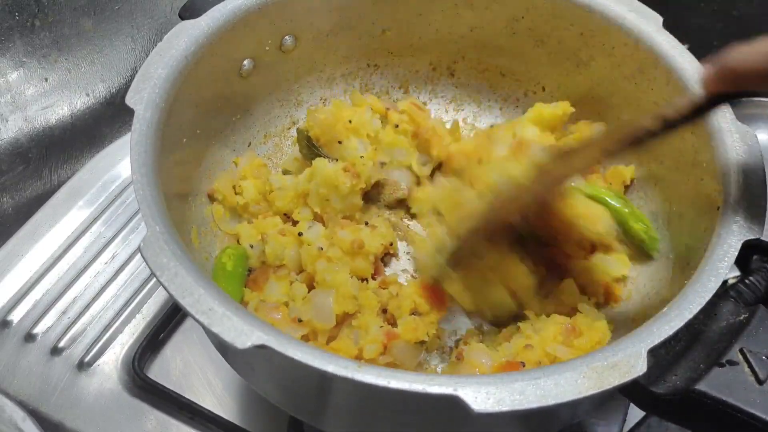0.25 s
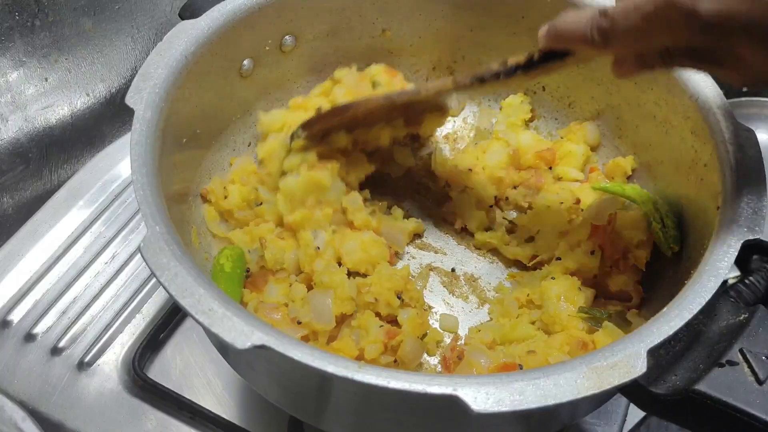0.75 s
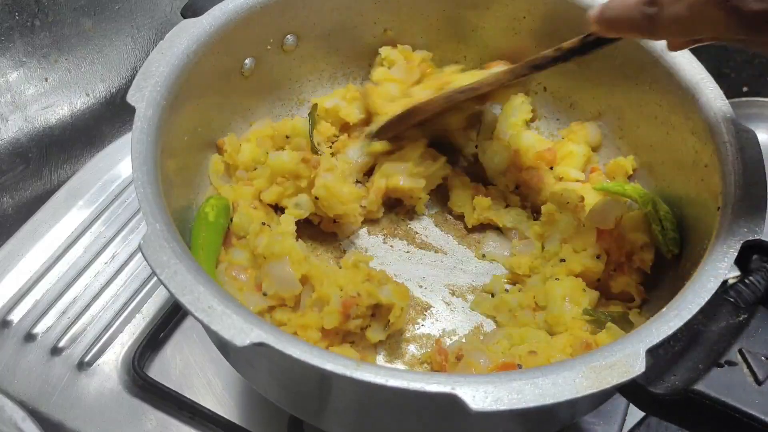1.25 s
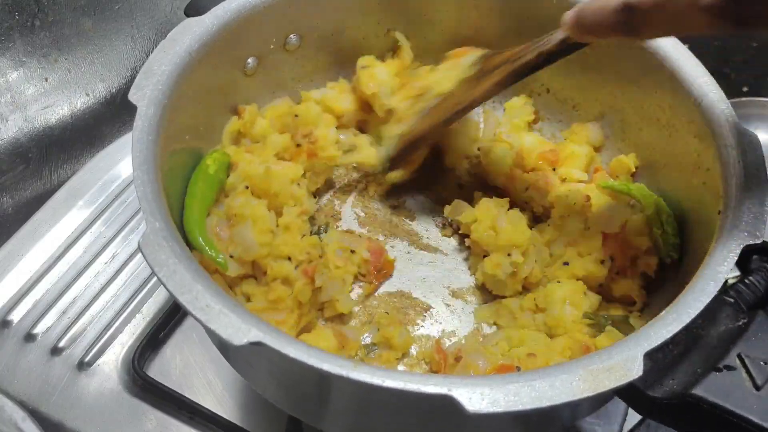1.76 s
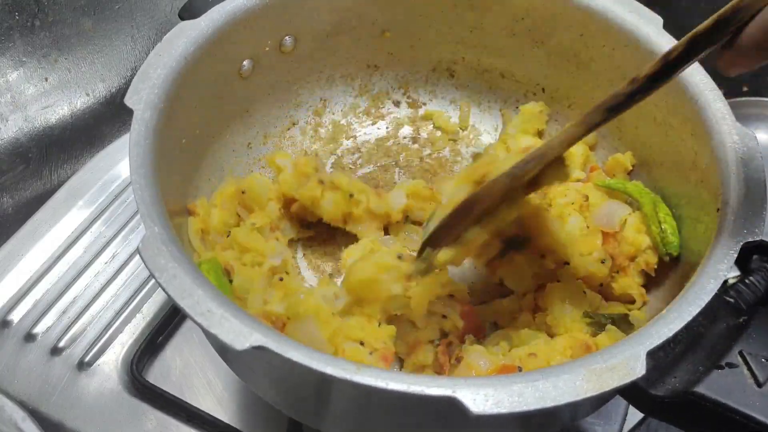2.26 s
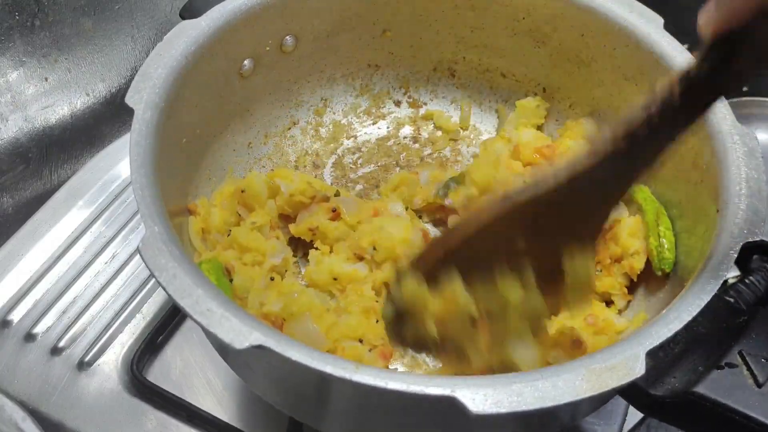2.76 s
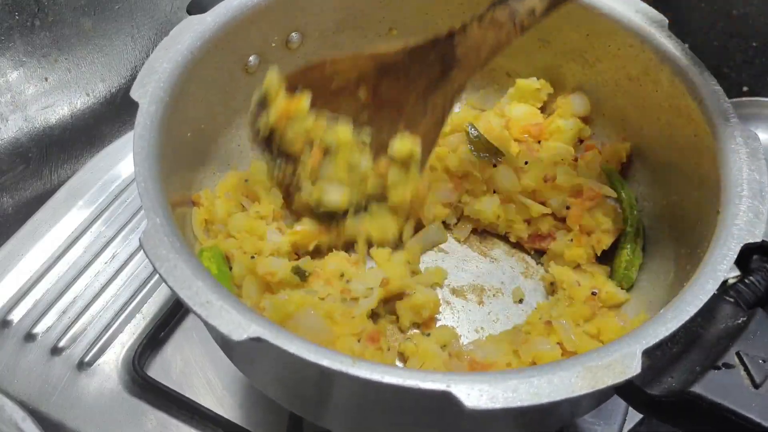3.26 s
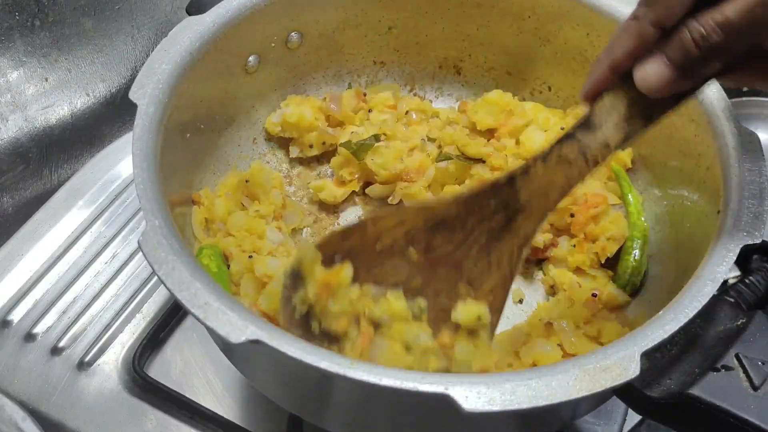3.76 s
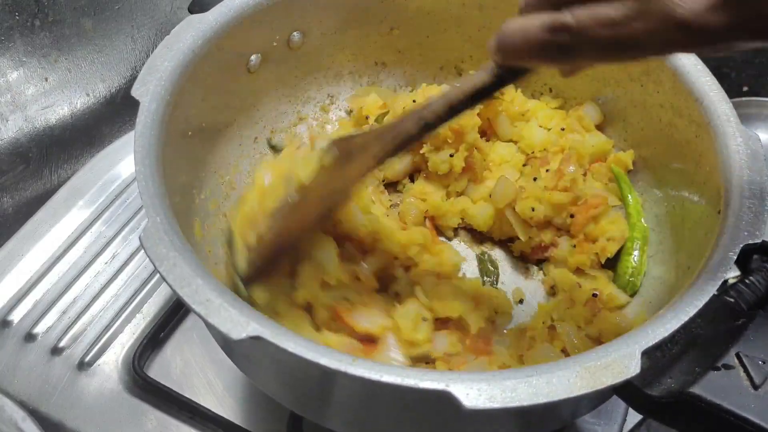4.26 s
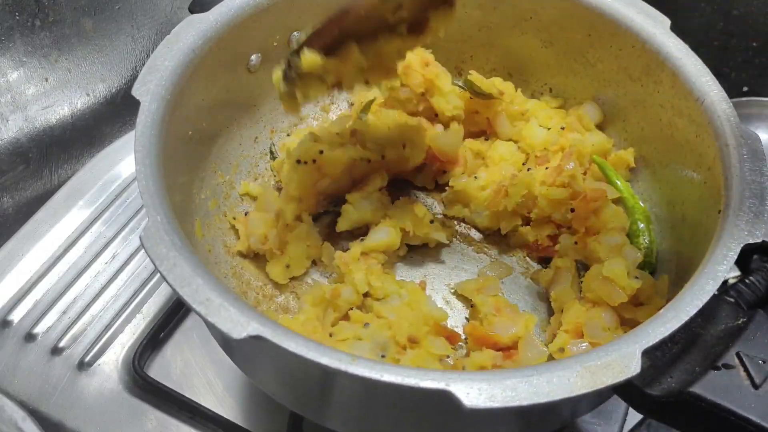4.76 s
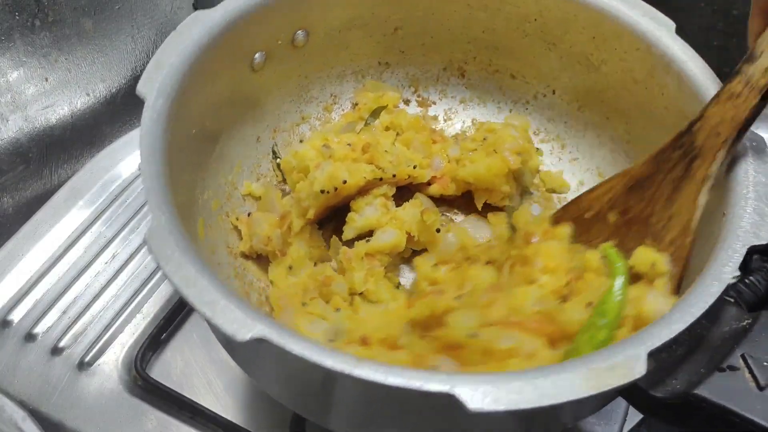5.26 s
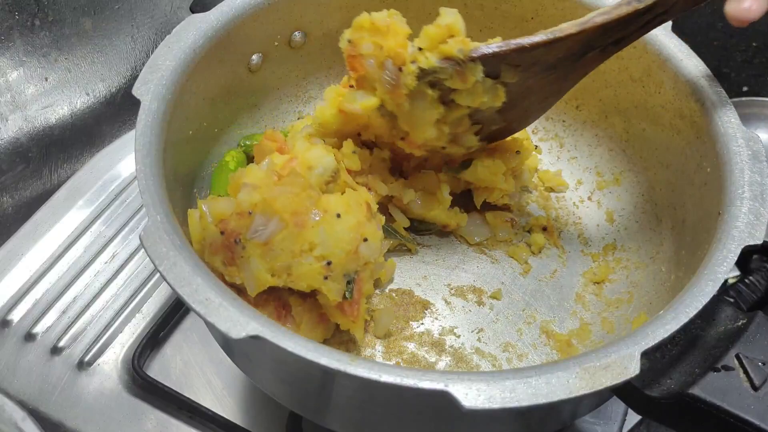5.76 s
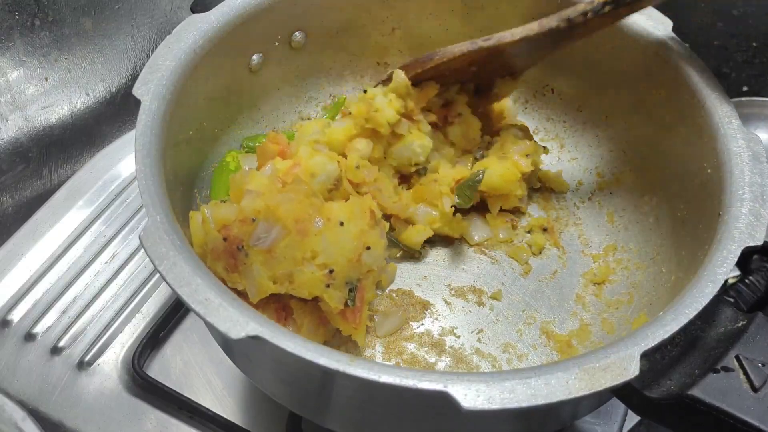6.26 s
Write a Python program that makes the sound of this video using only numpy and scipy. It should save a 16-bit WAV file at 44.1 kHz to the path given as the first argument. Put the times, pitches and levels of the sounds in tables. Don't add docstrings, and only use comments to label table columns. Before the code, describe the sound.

Close microphone beside a heavy pot on a stove, with faint room hum and weak sizzle. Wood hits metal several times in an irregular stirring rhythm, each dull clonk followed by a scrape. Brighter cracks come in pairs around the middle, with a thin squeak. After a quieter gap, the blade rasps, slaps the wall loudly, sweeps the bare metal and leaves a short ring before a soft final touch.

```python
import sys
import numpy as np
from scipy import signal
from scipy.fft import rfft, irfft, next_fast_len
from scipy.io import wavfile
from scipy.ndimage import uniform_filter1d

SR = 44100
rng = np.random.default_rng(int(sys.argv[2]) if len(sys.argv) > 2 else 0)


def generate_wav(sig):
    pcm = np.round(np.clip(np.atleast_2d(sig).T, -1, 1) * 32767).astype(np.int16)
    wavfile.write(sys.argv[1], SR, pcm)


def level_to_linear(level):
    exponent = np.asarray(level, float) / 20
    return 10 ** exponent


N = 287532

# f/Hz, level/dB per Hz
KITCHEN = [(15, -67), (25, -9), (209, -4), (282, -21), (399, -14), (920, -26), (1530, -24.5), (1710, -22.5),
           (2930, -15), (4380, -16), (5890, -24), (6740, -30.5), (15500, -28)]
# t/s, level/dB
SIZZLE = [(0.0, -50), (2.72, -51), (3.19, -54), (4.99, -52), (5.19, -64), (5.48, -83), (5.771, -60),
          (6.52, -55.5)]
# f/Hz, correlation/1
SAME = [(60, 0.89), (180, 0.84), (550, 0.28), (1650, -1.26), (4970, 0.7), (15000, -0.31)]
# f/Hz, left-right/dB
PORTS = [(60, -0.5), (250, -1.3), (600, 1.1), (1300, -1.5), (2600, -1), (4200, -4), (6500, -16), (8500, 1),
         (10500, 0.5), (13000, -6.5), (15500, -20.5)]

# level/dB on stand, wall, edge, grit, stove
REST_DB = [-75, -72, -66, -59.5, -74]
# t/s, hold/s, stand level/dB, wall level/dB, edge level/dB
STROKES = [(0.0, 0.045, -34.5, -33.5, -37), (.255, 0.06, -74, -78, -51.5),
           (0.557, 0.077, -34, -31.5, -36.5), (.84, 0.065, -41.5, -79, -77), (1.082, 0.26, -41.5, -42, -74),
           (1.31, 0.084, -33.5, -45.5, -65), (1.618, 0.02, -50, -71, -60), (1.83, 0.1, -35, -43.5, -41),
           (2.096, 0.42, -44.5, -57, -58.5), (2.644, 0.051, -40.5, -50.5, -51.5),
           (2.827, 0.038, -55, -81, -78), (2.954, 0.079, -38.5, -45, -42.5), (3.025, 0.06, -30, -43.5, -48),
           (3.293, 0.045, -37, -55, -47), (3.363, 0.0043, -28.5, -37, -43), (3.871, 0.057, -37, -48, -47),
           (3.928, 0.0092, -25.5, -35, -40.5), (4.23, 0.086, -31.5, -37, -42.5),
           (4.661, 0.072, -37, -29.5, -42.5), (4.976, 0.098, -38.5, -51, -45),
           (5.39, 0.049, -35, -32, -50.5), (5.436, 0.023, -29.5, -31.5, -28), (5.643, 0.012, -29, -47, -46),
           (6.302, 0.05, -60, -71, -60)]
# middle t/s, length/s, stand level/dB, metal level/dB, grit level/dB
SLIDES = [(0.0, 0.17, -48, -48, -39.5), (0.31, 0.27, -64.5, -63.5, -54.5), (0.62, 0.17, -46, -49, -38),
          (0.887, 0.5, -72, -62, -55), (1.26, 0.75, -52, -71, -65), (1.79, 0.24, -52.5, -59, -68),
          (1.872, 0.11, -34, -59, -45), (2.756, 0.18, -50.5, -92, -80), (3.26, 0.14, -48, -55.5, -61),
          (3.54, 0.34, -82, -57.5, -55), (3.852, 0.04, -49, -69, -58), (4.37, 0.61, -63, -64, -59),
          (5.013, 0.11, -57.5, -47.5, -45.5), (5.145, 0.13, -51.5, -51, -47.5),
          (5.303, 0.94, -56.5, -50, -50.5), (5.441, 0.13, -43, -35.5, -53), (5.51, 0.27, -34, -39, -31.5),
          (5.854, 0.83, -64, -72, -104), (6.351, 0.68, -68.5, -65.5, -60.5)]
# rate/(dB/s) on stand, wall, edge, grit, stove
RELEASE_DB_PER_S = [180, 197, 180, 130, 81.4]
# f/Hz, level/dB per Hz
DRAG = [(24, -72), (40, -48.5), (241, 0.5), (287, 9), (317, -4), (397, -3), (562, -6), (881, -8.5),
        (1220, -15), (1820, -16.5), (4570, -21.5), (6980, -14.5), (9900, -22), (10900, -32), (15500, -31)]
# f/Hz, level over the drag/dB, t60/s
POT = [(136, 21, 1), (178.2, 14, 0.83), (249, -2, 0.095), (300, -5, 0.91), (353.8, 9.5, 0.26),
       (397, 8.5, 0.17), (520, -4, 0.12), (649, 2.5, 0.12), (815, -8, 0.33), (881, 8.5, 0.35),
       (980, 2.5, 0.092), (1033, 2, 0.039), (1183, 5.5, 0.021), (1580, 0, 0.38), (1726, 0, 0.095),
       (2260, 3, 0.25), (2460, 5.5, 0.15), (2900, 6.5, 0.35), (3335, 5, 0.3), (3590, 4, 0.36),
       (4480, 6, 0.036), (5010, 6.5, 0.11), (6050, -2, 0.083), (5400, 5, 0.27), (6750, 1, 0.41),
       (7100, 5, 0.08), (7400, 8, 0.067), (8560, 14.5, 0.47)]
EDGES_HZ = [150, 760, 1400, 4000, 16500]

# t/s, peak level/dB, f/Hz, spread/share of f, t60/s
KNOCKS = [(0.547, -16.5, 852, 0.63, 0.053), (0.552, -22.5, 843, 0.25, 0.034), (0.841, -32, 418, 0.2, 0.045),
          (1.082, -31, 840, 0.31, 0.045), (1.3177, -17.5, 540, 0.4, 0.058),
          (2.103, -37.5, 407, 0.32, 0.042), (2.648, -36, 690, 0.78, 0.016), (4.235, -19, 592, 0.36, 0.013),
          (4.6628, -21, 858, 0.58, 0.036), (4.667, -22, 827, 0.18, 0.14), (4.974, -37.5, 345, 0.26, 0.036),
          (5.392, -13.5, 696, 0.18, 0.051), (5.63, -30, 330, 0.22, 0.02)]
CRACKS = [(1.7858, -26, 1840, 0.05, 0.04), (1.8233, -18, 1775, 0.29, 0.038),
          (2.9517, -21.5, 2063, 0.16, 0.044), (3.0252, -21.5, 1950, 0.13, 0.022),
          (3.294, -26, 1810, 0.22, 0.042), (3.367, -15, 2060, 0.15, 0.013),
          (3.8715, -27.5, 2030, 0.16, 0.072), (3.9282, -16.5, 1874, 0.2, 0.021),
          (4.2349, -20.5, 1720, 0.43, 0.011), (4.9745, -34, 2550, 0.92, 0.015)]
TICKS = [(2.9512, -21.5, 3030, 0.45, 0.023), (3.001, -31, 3000, 0.72, 0.014),
         (3.371, -41, 3100, 0.3, 0.014), (3.9293, -28, 3730, 0.068, .02), (4.236, -26, 3500, .12, .02),
         (4.664, -35, 4620, 0.023, 0.04), (6.419, -34, 7050, 0.054, 0.023)]
SLAP = [(5.4047, -12, 4400, .014, .03), (5.4047, -10.5, 5850, .014, .03), (5.4048, -16, 6450, .012, .028),
        (5.4049, -21, 8300, .04, .018), (5.405, -10.5, 2900, 0.022, 0.05), (5.4052, -14, 1770, 0.03, 0.075)]
CATCHES = [(1.167, -31, 875, .08, .03), (1.718, -37, 1420, 0.033, .04), (1.743, -32, 1770, 0.041, .035),
           (1.756, -32, 1800, 0.057, .03), (5.112, -41, 1014, .15, .03), (5.177, -26.5, 1120, 0.12, .03),
           (5.199, -42, 1246, 0.28, .025), (5.219, -38, 1030, 0.055, .03), (5.25, -33.5, 960, 0.072, .03),
           (5.292, -33.5, 940, 0.047, .03), (5.347, -32, 910, .2, .03)]
BUMPS = [(1.849, -29, 300, 0.24, 0.095), (2.635, -45, 300, 0.34, 0.077), (2.957, -38, 382, 0.024, 0.2),
         (2.979, -30.5, 370, 0.021, .12), (3.371, -27.5, 389, 0.069, 0.17), (1.322, -31.5, 402, 0.13, .15),
         (4.24, -32.5, 364, .05, .15), (3.064, -35, 300, 0.068, 0.081), (3.144, -38, 272, 0.091, .07),
         (3.18, -46, 285, .1, .07), (5.434, -32.5, 300, 0.094, 0.08), (5.466, -27, 340, 0.19, 0.086),
         (5.491, -33, 300, 0.1, .07), (5.516, -41, 285, 0.15, .05), (5.545, -39.5, 290, .1, 0.066),
         (5.648, -28.5, 284, 0.058, 0.12)]
PAN_DB = [-1.2, -6, -1.5, 7, -1.5, -.8]
LEAD_S = [.00003, .0001, .0001, .00021, 0, .0001]

# f/Hz, level/dB, t60/s
BELL = [(882, 1, 0.14), (999, -6, 0.31), (1086.4, -12.5, 0.49), (1128, -13, 0.31), (1615, -13.5, 0.18)]
# t/s, level/dB
BELL_HITS = [(0, -25.5), (0.547, -24.5), (1.319, -39), (4.236, -37), (4.666, -27.5)]
# t/s, low level/dB, low centre f/Hz, upper level/dB, upper centre f/Hz
SCRAPES = [
    [(1.085, -44, 930, -62, 1400), (1.15, -41, 960, -54, 1400), (1.17, -39, 930, -45, 1420),
     (1.2, -45, 1000, -44, 1800), (1.245, -50, 1000, -44, 1650), (1.29, -56, 1000, -56, 1600)],
    [(1.69, -58, 820, -62, 1400), (1.712, -44, 850, -46, 1400), (1.724, -43, 950, -38, 1420),
     (1.742, -40, 975, -39, 1780), (1.76, -41, 975, -38, 1780), (1.775, -48, 975, -46, 1800),
     (1.788, -41, 975, -38, 1850), (1.822, -46, 975, -50, 1800)],
    [(5.108, -50, 1000, -56, 1350), (5.125, -42, 1050, -47, 1380), (5.18, -40, 1090, -45, 1400),
     (5.22, -41, 1060, -47, 1300), (5.29, -47, 1000, -54, 1300), (5.38, -52, 890, -56, 1300)],
]
RASP_HZ = [770, 826, 952, 1082, 1180, 1328, 1420, 1580, 1770, 1963, 2340]
# t/s, f/Hz, level/dB
SQUEAK = [(2.79, 3400, -74), (2.835, 3395, -63), (2.9, 3400, -56), (2.955, 3415, -55), (2.98, 3420, -64),
          (3.2, 3420, -68)]
# t/s, f/Hz, level/dB
RING_LOW = [(5.66, 1760, -70), (5.71, 1750, -63), (5.77, 1750, -69), (5.82, 1750, -82)]
RING_MID = [(5.57, 2560, -58), (5.61, 2555, -48), (5.68, 2550, -53), (5.78, 2550, -63), (5.85, 2550, -76)]
RING_TOP = [(5.56, 8620, -58), (5.62, 8630, -56), (5.7, 8630, -66), (5.83, 8630, -74)]
# t/s, f/Hz, level/dB
OVERTONES = [
    [(2.82, 1620, -79), (2.86, 1610, -68), (2.91, 1600, -73)],
    [(2.82, 1253, -70), (2.92, 1303, -73), (2.95, 1270, -53)],
    [(2.82, 2950, -65), (2.88, 2880, -66), (2.95, 3020, -56)],
    [(1.71, 4940, -53), (1.74, 4900, -72), (1.82, 4820, -58)],
    [(1.71, 3350, -68), (1.76, 3330, -67), (1.82, 3380, -58)],
    [(1.71, 6560, -85), (1.76, 6690, -63), (1.82, 6540, -47)],
    [(5.11, 2860, -56), (5.2, 2766, -56), (5.3, 2840, -69)],
    [(4.975, 2920, -64), (5.03, 2840, -52), (5.07, 2800, -64)],
]

SAG_DB_PER_S = 75.5
DIG_S = .004
GRIT_UNDER_EDGE_DB, SLIDE_ENDS_DB = -9, -21
LIFT_S, LIFT_DB = 4.7, -7.5
SHAKE_DB, SHAKE_SHARE = -54.5, 0.45
WALL_SHARE = 0.06
SLIDE_SHAKE_DB, SLIDE_WALL_DB = -3, -11


def evened(x):
    return x / np.sqrt(np.mean(x ** 2) + 1e-20)


def read(points, hz):
    f, value = np.transpose(points)
    return np.interp(np.log(hz + 1), np.log(f + 1), value)


def add(mix, s, sound):
    part = mix[:, round(s * SR):][:, :sound.shape[1]]
    part += sound[:, :part.shape[1]]


def drift(shape, span):
    smooth = uniform_filter1d(rng.standard_normal(shape), span, -1)
    return evened(uniform_filter1d(smooth, span, -1))


def causal(gain):
    log_gain = np.log(np.maximum(gain, 1e-5 * gain.max()))
    mirrored = np.r_[log_gain, log_gain[-2:0:-1]]
    return np.exp(np.conj(signal.hilbert(mirrored)))[:len(gain)]


def resonate(x, hz, width):
    turn = np.exp(2j * np.pi * np.cumsum(hz) / SR)
    r = np.exp(-np.pi * width / SR)
    return 2 * (turn * signal.lfilter([1 - r], [1, -r], x / turn)).real


def kitchen():
    frames, hz = N // 256 + 5, np.fft.rfftfreq(1024, 1 / SR)
    a, b, c, d = rng.standard_normal((frames, 513, 4)).T
    patches = evened(uniform_filter1d(drift((513, frames), 6), 8, 0))
    same = np.clip(read(SAME, hz), -1, 1)[:, None]
    left = a + 1j * b
    right = same * left + np.sqrt(1 - same ** 2) * (c + 1j * d)
    z = np.array([left, right])
    z *= level_to_linear(read(KITCHEN, hz)[:, None] + 3.4 * patches + 0.33 * drift(frames, 3))
    z *= level_to_linear(np.array([[[-2.5]], [[2.5]]]) * np.clip(hz / 5000, 0, 1)[:, None])
    s, db = np.transpose(SIZZLE)
    level = level_to_linear(np.interp(np.arange(N) / SR, s, db) - 7.5)
    return level * evened(signal.istft(z, nperseg=1024, noverlap=768)[1][:, :N])


def rumble(level_db):
    hz = np.fft.rfftfreq(N, 1 / SR)
    one, *own = rng.standard_normal((3, N))
    colour = (hz / 150) ** 2.47 / (1 + (hz / 170) ** 7)
    low = irfft(rfft(one + 0.14 * np.array(own)) * colour, N)
    return level_to_linear(uniform_filter1d(level_db, 900) + 1.8 * drift(N, 2000)) * evened(low)


def room(x, t60):
    taps = np.zeros((2, SR // 2))
    at = np.arange(120, SR // 2 - 20, 20) + rng.integers(0, 20, (2, (SR // 2 - 121) // 20))
    np.put_along_axis(taps, at, rng.choice([-1., 1.], at.shape), 1)
    tail = taps * level_to_linear(-60 * np.arange(SR // 2) / SR / t60)
    return signal.fftconvolve(x, tail / np.linalg.norm(tail[0]), axes=1)[:, :N]


def squeak(rows, fuzzy):
    s, hz, db = np.transpose(rows)
    t = np.arange(s[0], s[-1], 1 / SR)
    level = level_to_linear(np.interp(t, s, db) + 1.5 * drift(len(t), 250)) * signal.windows.tukey(len(t), .2)
    hz = np.interp(t, s, hz)
    tone = np.sqrt(2) * np.sin(2 * np.pi * np.cumsum(hz) / SR + np.array([[.7], [0]]))
    fuzz = evened(resonate(rng.standard_normal((2, len(t))), hz, 60))
    return s[0], level * (tone + fuzzy * fuzz) * level_to_linear(np.array([[0], [3]]))


def bell(db):
    t = np.arange(SR // 2) / SR
    out = np.zeros((2, len(t)))
    for hz, mode_db, t60 in BELL:
        phase = 2 * np.pi * rng.random((2, 1, 1)) + np.array([[1.6], [0]])
        mode = np.sin(2 * np.pi * hz * t + phase[0])
        twin = .4 * np.sin(2 * np.pi * hz * 1.013 * t + phase[1])
        out += level_to_linear(db + mode_db - 60 * t / t60) * (mode + twin)
    return out * (1 - np.exp(-t / 0.00071))


def scrape(rows):
    s, *columns = np.transpose(rows)
    t = np.arange(s[0], s[-1], 1 / SR)
    low_db, low_hz, upper_db, upper_hz = (np.interp(t, s, c) for c in columns)
    one, *own = rng.standard_normal((3, len(t)))
    rub = (0.6 * one + np.array(own)) * level_to_linear(3.2 * drift(len(t), 80))
    out = np.zeros((2, len(t)))
    for hz in RASP_HZ:
        near = sum(level_to_linear(db) * np.exp(-.5 * (np.log(hz / centre) / reach) ** 2)
                   for db, centre, reach in ((low_db, low_hz, .08), (upper_db, upper_hz, .09)))
        out += near * evened(resonate(rub, hz * np.ones(len(t)), width=50))
    return s[0], level_to_linear(-4) * out * signal.windows.tukey(len(t), .1)


def knock(db, hz, spread, t60, pan_db, lead_s):
    t = np.arange(4000) / SR
    jitter, phase, turn = rng.standard_normal((3, 20, 1))
    place = np.linspace(-2, 2, 20)[:, None] + .08 * jitter
    tone_hz = hz * np.exp(spread * place)
    angle = 2 * np.pi * tone_hz * t + .4 * phase
    weight = np.exp(-place ** 2 / 2)
    left = (weight * np.sin(angle + 2 * np.pi * tone_hz * lead_s)).sum(0)
    right = (weight * np.sin(angle + .4 * turn)).sum(0)
    blow = np.array([left, right]) * level_to_linear(-60 * t / max(t60, .004)) * (1 - np.exp(-t * hz / .7))
    return blow / abs(blow[1]).max() * level_to_linear(db + np.array([[.5], [-.5]]) * pan_db)


def shaken(stand_db, wall_db):
    return SHAKE_DB + SHAKE_SHARE * (stand_db + 44) - WALL_SHARE * (wall_db + 45.0)


def pressure():
    t = np.arange(0, N + 64, 64) / SR
    lift_db = LIFT_DB * np.clip((t - LIFT_S) / 0.032, 0, 1)
    power = level_to_linear(np.array(REST_DB)[:, None] + lift_db) ** 2
    blows = np.array(KNOCKS + CRACKS)[:, 0]
    for s, hold, stand_db, wall_db, edge_db in STROKES:
        s = min([b for b in blows if abs(b - s) < .015] or [s - DIG_S])
        top_db = np.array([[stand_db], [wall_db], [edge_db], [edge_db + GRIT_UNDER_EDGE_DB],
                           [shaken(stand_db, wall_db)]])
        sag_db = SAG_DB_PER_S * np.clip(t - s, 0, hold)
        fall_db = sag_db + np.outer(RELEASE_DB_PER_S, np.maximum(t - s - hold, 0))
        power += np.clip((t - s) / DIG_S, 0, 1) ** 2 * level_to_linear(top_db - fall_db) ** 2
    for s, length, stand_db, metal_db, grit_db in SLIDES:
        top_db = np.array([[stand_db], [metal_db + SLIDE_WALL_DB], [metal_db], [grit_db],
                           [shaken(stand_db, metal_db) + SLIDE_SHAKE_DB]])
        power += level_to_linear(top_db + np.maximum(SLIDE_ENDS_DB * (2 * (t - s) / length) ** 2, -99)) ** 2
    return np.repeat(10 * np.log10(power), 64, axis=1)[:, :N]


def drag(levels_db):
    size = 2 * next_fast_len(N // 2 + SR)
    hz = np.fft.rfftfreq(size, 1 / SR)
    modes = 1 + sum(level_to_linear(db) * 1.1 / t60 / (1.1 / t60 + 1j * (hz - f)) for f, db, t60 in POT)
    slips = level_to_linear(4.5 * np.minimum(rng.exponential(1, N), 4)) * (rng.random(N) < 2500 / SR)
    judder = drift(N, 150)
    lumps_db = [0.99, 0.97, 1.8, 1.3]
    grit_shares = [0.09, 0.22, 0.25, 0.55]
    port_likeness = [0.91, 0.069, 0.25, 0.088]
    out = np.zeros((2, N))
    for db, lo, hi, lumpy_db, gritty, alike in zip(levels_db, EDGES_HZ, EDGES_HZ[1:],
                                                   lumps_db, grit_shares, port_likeness):
        band = np.sqrt((1 + (lo / (hz + 1)) ** 12) * (1 + (hz / hi) ** 12))
        part = modes * causal(level_to_linear(read(DRAG, hz)) / band)
        part = part / np.sqrt(np.mean(abs(part) ** 2))
        one, own = rng.standard_normal(N), rng.standard_normal((2, N))
        one = evened(one * (1 - gritty + gritty * evened(slips)))
        contact = np.sqrt(alike) * one + np.sqrt(1 - alike) * own
        out += irfft(rfft(contact * level_to_linear(db + lumpy_db * judder), size) * part, size)[:, :N]
    return out


def scene():
    *contact_db, stove_db = pressure()
    steady = kitchen() + rumble(stove_db) + drag(contact_db)
    struck = np.zeros((2, N))
    sung = [(SQUEAK, .3), (RING_LOW, .12), (RING_MID, .12), (RING_TOP, .2)]
    for rows, fuzzy in sung + [(rows, .7) for rows in OVERTONES]:
        add(struck, *squeak(rows, fuzzy))
    for s, db in BELL_HITS:
        add(struck, s, bell(db))
    for rows in SCRAPES:
        add(struck, *scrape(rows))
    groups = (KNOCKS, CRACKS, TICKS, SLAP, CATCHES, BUMPS)
    for blows, pan_db, lead_s in zip(groups, PAN_DB, LEAD_S):
        for s, *row in blows:
            add(struck, s, knock(*row, pan_db, lead_s))
    return struck + level_to_linear(-7.0) * room(struck, t60=0.28) + steady


def suppress(x):
    hz, t, z = signal.stft(x, SR, nperseg=1024, noverlap=768)
    band = (hz / 230).astype(int)
    patches = drift((2, band[-1] + 1, len(t)), 11)[:, band]
    depth = np.clip((hz - 500) / 1200, 0, 1)[:, None]
    gain_db = 3.6 * patches - 12 * np.maximum(-patches - 1.7, 0)
    level_db = 10 * np.log10((abs(z) ** 2).sum((0, 1)) + 1e-12)
    quiet = np.clip((-45 - level_db) / 15 + 1, .5, 1)
    return signal.istft(z * level_to_linear(gain_db * depth * quiet), SR, nperseg=1024, noverlap=768)[1][:, :N]


def top_cut(x):
    return signal.sosfilt(signal.butter(12, 15610, fs=SR, output="sos"), x)


def record(dry):
    hz = np.fft.rfftfreq(N, 1 / SR)
    tilt = level_to_linear(.5 * read(PORTS, hz))
    lag = np.exp(-2j * np.pi * hz * 0.00021)
    ported = irfft(rfft(dry) * np.array([tilt * lag, 1 / tilt]) * (hz < 15600), N)
    ported = signal.sosfilt(signal.butter(2, 90, "high", fs=SR, output="sos"), ported)
    return top_cut(np.clip(suppress(ported), -1, 1))


dry = scene()
out = record(dry)
generate_wav(out)
```